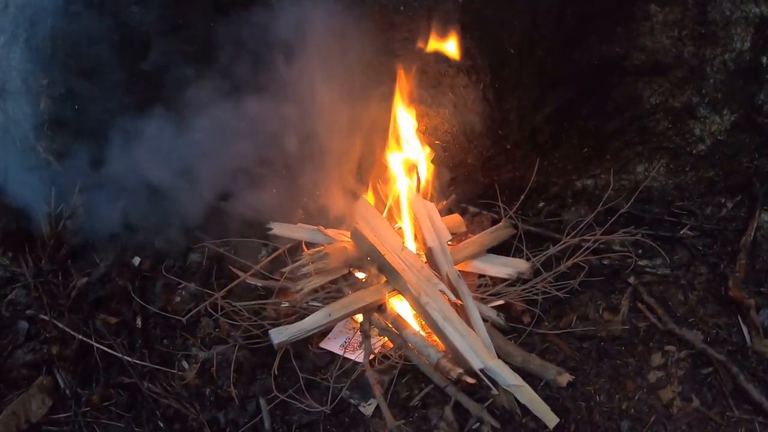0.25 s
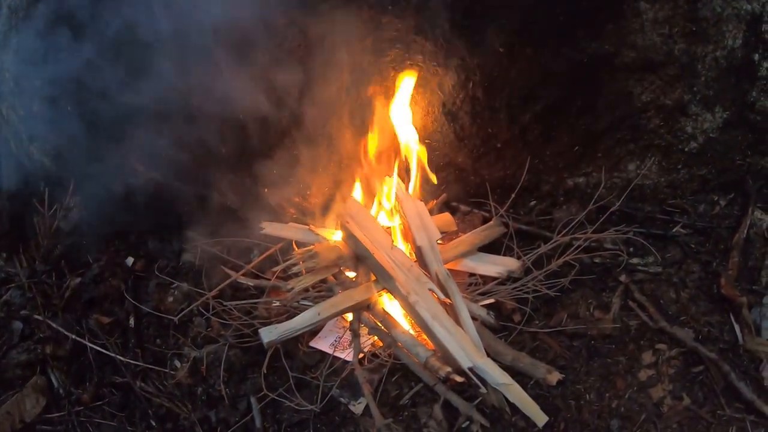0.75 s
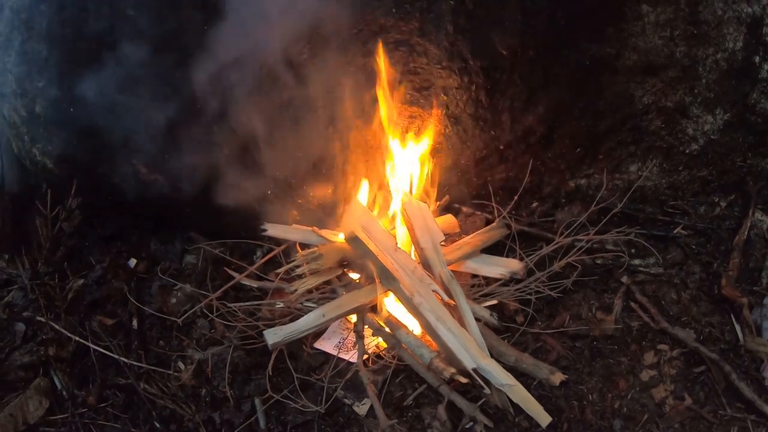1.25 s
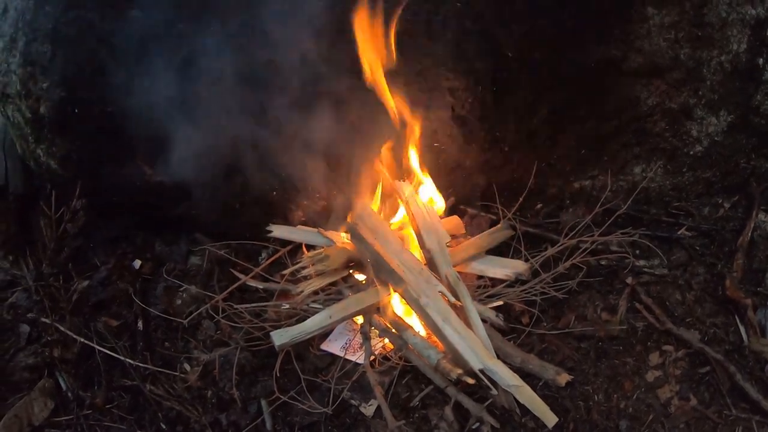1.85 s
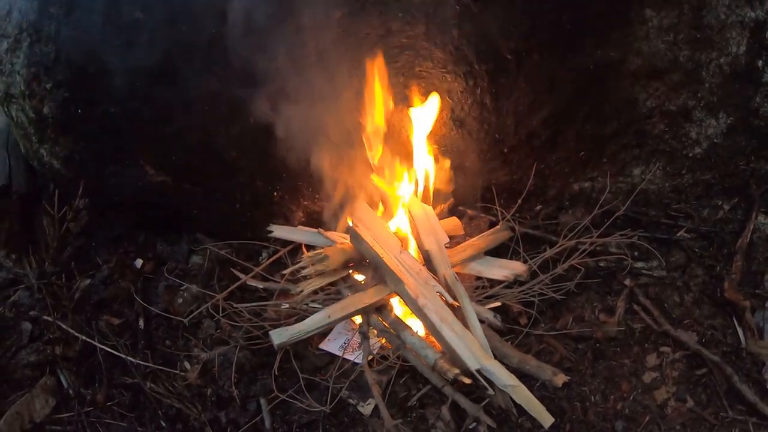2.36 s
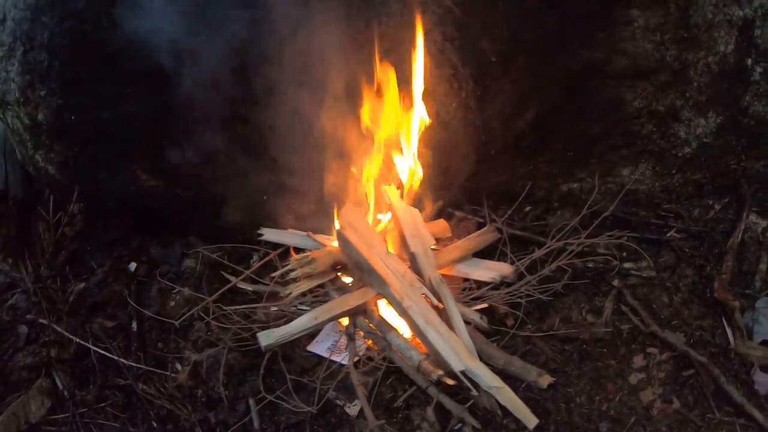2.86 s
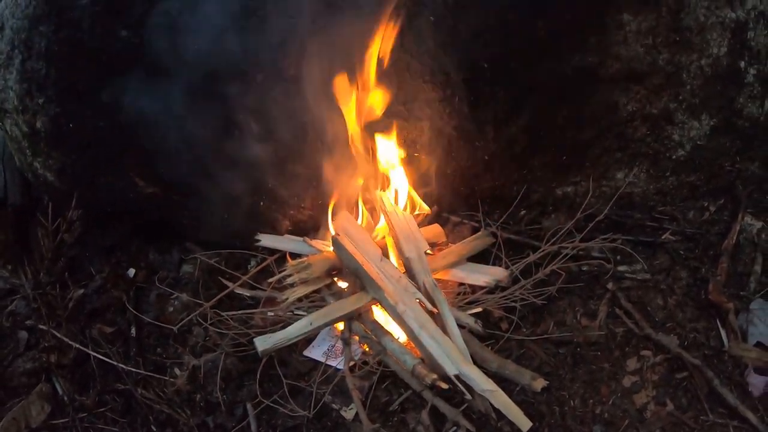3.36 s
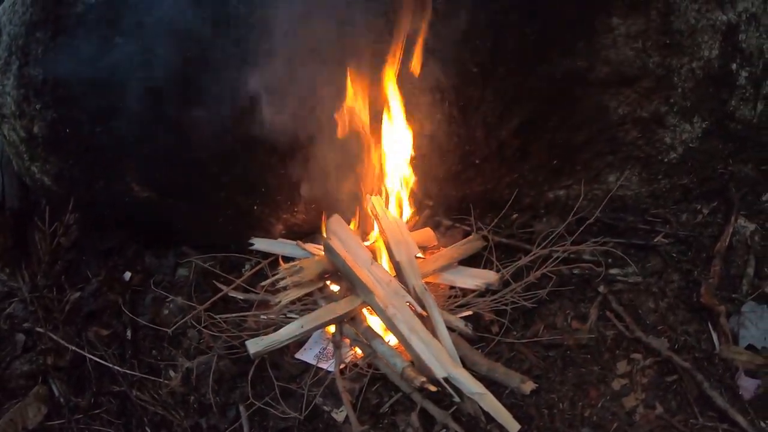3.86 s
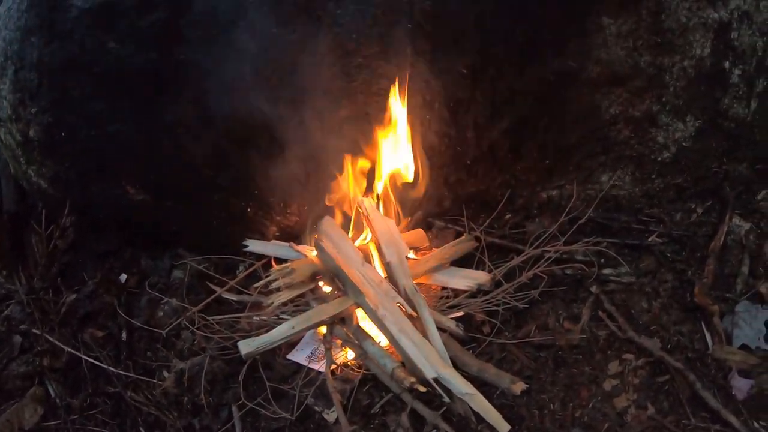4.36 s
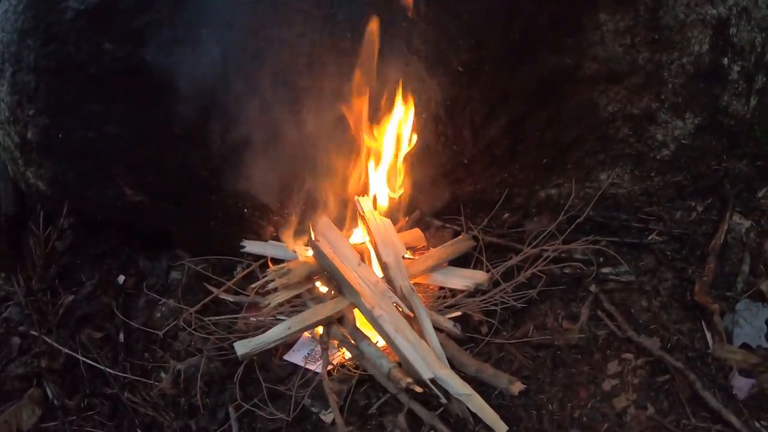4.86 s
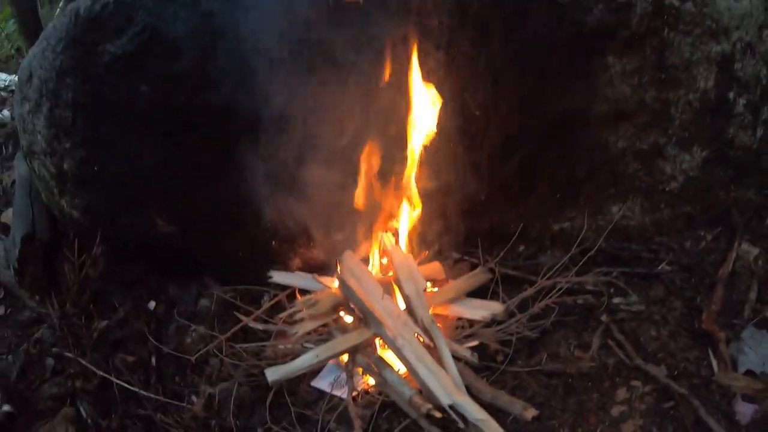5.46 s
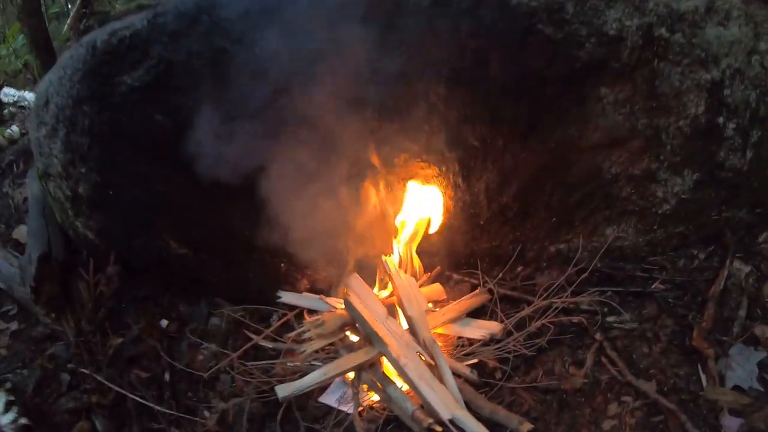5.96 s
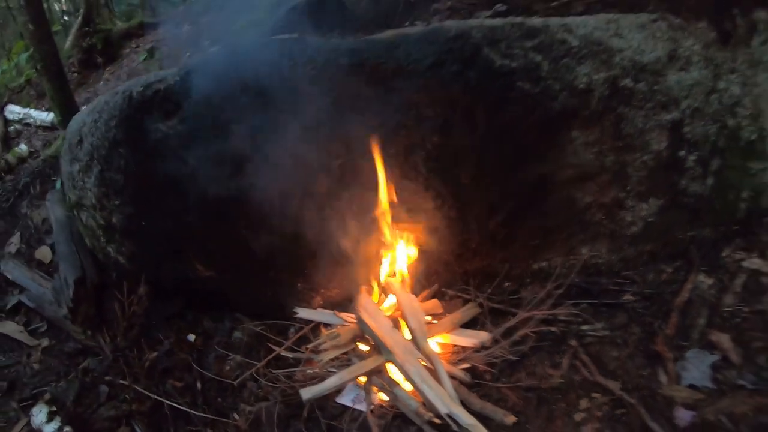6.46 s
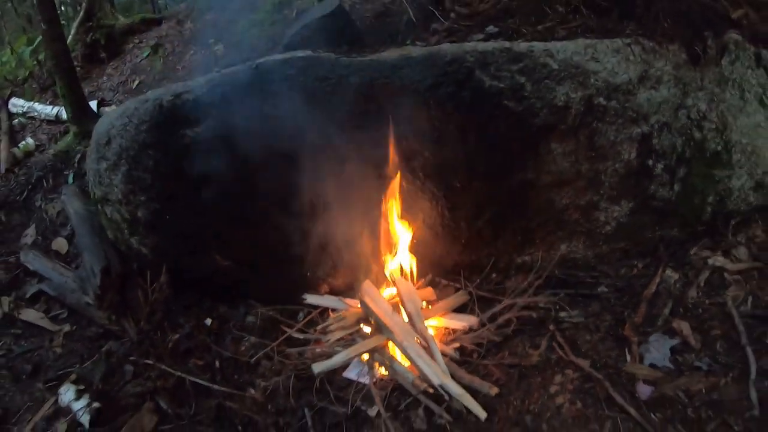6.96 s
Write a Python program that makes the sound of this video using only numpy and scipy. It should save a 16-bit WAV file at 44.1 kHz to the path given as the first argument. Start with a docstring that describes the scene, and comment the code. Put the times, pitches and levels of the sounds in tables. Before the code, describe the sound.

A small campfire of fresh split wood, heard close outdoors with little reverberation. Irregular crackling, from tiny ticks to sudden hard snaps, dominates a soft low roar with brief fluttering thuds. Faint steam hisses, surging briefly after a big double crack early on. Cracks cluster densely in the later part, then a thin flickering hiss stays on the right before a very short breathy squeak.

```python
"""Small kindling fire

Sap pockets burst and crack the sticks before a rock: noise bursts through resonances, plus echoes.
Flames roar, rumble and flap low: gusted noise and short pulses. Steam and the quiet woods are coloured noise.
Near the end a vent hisses on the right and something squeaks once: a wavering sine with narrow noise above."""
import sys
import numpy as np
from scipy import signal
from scipy.fft import rfft, irfft, next_fast_len
from scipy.io import wavfile
from scipy.ndimage import uniform_filter1d

SR = 44100
rng = np.random.default_rng(int(sys.argv[2]) if len(sys.argv) > 2 else 0)


def put_to_file(sound):
    """Save the sound as 16-bit audio at rate SR, in the file named by the first command-line argument."""
    columns = np.atleast_2d(sound).T  # one column per channel
    safe = np.clip(columns, -1, 1)
    whole_steps = np.round(safe * 32767)
    wavfile.write(sys.argv[1], SR, whole_steps.astype(np.int16))


N = 317961  # 7.21 s

# colour of the woods, before levelling: (frequency [Hz], relative density [dB per Hz])
WOODS_COLOUR = [(180, -25), (300, 11), (376, 4), (562, -3.5), (826, 2), (1050, -9), (1300, -4), (4060, -30),
                (7720, -25.5), (12300, -22.5), (14000, -35.5)]
# flame body: (time [s], roar level [dB], rumble level [dB]), before gusts
FLAME_LEVELS = [(0, -49, -67), (.6, -54, -75), (1.3, -54.5, -63), (2, -55.5, -65), (2.9, -51, -63),
                (3.25, -55, -63), (4, -55, -68.5), (4.9, -52.5, -61.5), (5.5, -53.5, -63.5),
                (6.3, -56.5, -54), (6.6, -54, -52.5), (7.21, -62, -71.5)]
# colour of the roar: (frequency [Hz], relative density [dB per Hz])
ROAR_COLOUR = [(47, -42), (80, 0.5), (102, -8), (173, 3.5), (213, -1.5), (457, -23), (700, -31), (910, -76),
               (1540, -120)]
# colour of the rumble: (frequency [Hz], relative density [dB per Hz])
RUMBLE_COLOUR = [(18, -27.5), (35, -12.5), (60, -2.0), (95, -10.5), (130, -12)]
# timed flaps of single flame tongues: (time of peak [s], peak level [dB], pitch [Hz])
TIMED_FLAPS = [(0.146, -34, 148), (0.169, -32, 129), (0.283, -31.5, 159), (0.371, -30.5, 195),
               (0.512, -36, 102), (0.686, -37, 148), (0.918, -35.5, 89), (1.007, -36, 176),
               (1.117, -35, 155), (1.487, -38, 82.5), (1.776, -33.5, 170), (2.255, -35.5, 130),
               (2.434, -31, 162), (2.484, -34, 165), (2.535, -37, 185), (2.573, -41.5, 188),
               (2.886, -33.5, 109), (2.952, -35.5, 196), (3.141, -33, 142), (3.465, -39, 162),
               (3.634, -34, 139.6), (3.978, -34.5, 126), (4.757, -40, 161), (4.906, -34, 132),
               (4.998, -32.5, 150), (5.558, -44, 152), (6.003, -33.5, 116), (6.457, -33.5, 166)]
# flaps at random moments, mean and spread: (peak level [dB], pitch [Hz])
RANDOM_FLAP_MEAN = (-41.5, 112)
RANDOM_FLAP_SPREAD = (0.67, 27)
# colour of the steam from the cut ends: (frequency [Hz], relative density [dB per Hz])
STEAM_COLOUR = [(590, -26), (1000, -22), (1370, -7.5), (2230, -8), (3340, 2.5), (5380, -6.5), (7190, -2.5),
                (12300, -43), (13400, -45.5), (16000, -49)]
# surges of steam after bursts: (onset [s], added level [dB])
STEAM_SURGES = [(1.438, -61), (5.56, -67), (5.82, -66)]
# timed bursts of sap pockets, loud and faint: (time [s], body peak [dB], ring [Hz],
# low knock re body [dB], bright edge re body [dB], edge left minus right [dB])
TIMED_POPS = [(0.0658, -37.5, 3800, -13, -6.5, 9), (0.0786, -41, 3540, -16, -28, 11),
              (0.099, -42.5, 3520, -10, -33, -1), (0.1944, -40.5, 3250, -18, -8, -12),
              (0.3695, -22.5, 2650, -9, -14.5, -13), (0.4304, -31.5, 3180, -10, -5, -3),
              (0.5298, -26.5, 3400, -34, -6.5, -1), (0.5614, -33.5, 3320, -24, -29, -3),
              (0.7046, -47, 3680, -14, -7, -3), (0.7614, -36.5, 3200, -32, -34, -2),
              (0.8498, -44.5, 2380, -5, -28, -5), (0.9405, -46.5, 3230, -22, 4, -5),
              (1.127, -46, 3670, -30, -1, -6), (1.2107, -32.5, 4750, -8.5, 0, -12),
              (1.2622, -29.5, 4050, -29, -6.5, -6), (1.299, -36, 3100, -30, -14, 1),
              (1.329, -38.5, 2420, -21, 6, -2), (1.342, -36.5, 3640, -25, 0, -2),
              (1.3742, -34, 2950, -24, -10, -3), (1.3796, -7.5, 4500, -28, -14, 10),
              (1.4363, -3.5, 3060, -11.5, -5, -1), (1.4988, -39, 1900, -5, 1, -2),
              (1.5535, -17, 2970, -18, -38, 5), (1.5916, -30.5, 2800, -21, 0, 2),
              (1.679, -35.5, 2380, -7.5, -23, 8), (1.8057, -33, 2290, -9, 2, -4),
              (1.8337, -28, 2820, -11, 5, 4), (2.0417, -40.5, 2120, -20, -22, -2),
              (2.0608, -38.5, 1870, -6, -34, -6.5), (2.202, -42, 3770, -14, 6, -2.5),
              (2.2964, -36.5, 3600, -36, 0.5, -1), (2.3708, -40.5, 3500, -10, 2.5, -4),
              (2.425, -27.5, 3160, -25, -1, 1), (2.4297, -43, 4090, -7, -17, -4),
              (2.599, -45, 3320, -13, -12, -5), (2.6608, -39, 3540, -14, 5.5, 0),
              (2.7566, -30.5, 5450, -7, -8, 4), (2.793, -39, 6960, -19, -9, -13),
              (2.8344, -42, 7100, -9.5, -3, -1), (2.8598, -56, 1510, 11.5, -25, 0),
              (2.95, -64.5, 1480, 17.5, -22, 3.5), (3.0445, -29, 7000, -22, -3, -5),
              (3.059, -32, 7040, -24, -2.5, 0), (3.0855, -31, 2080, -18, -1, -1),
              (3.3193, -11.5, 2870, -7.5, -21.5, 27), (3.6111, -20, 3250, -11.5, -1, -4),
              (3.7013, -27, 3660, -14, -13, 19), (3.849, -43.5, 3810, -22, -38, 2),
              (3.9372, -23, 2900, -2, -12, 1), (3.9801, -39, 4500, -1, 1, -5),
              (3.9927, -20, 4580, -10.5, -2.5, -3), (4.1597, -47, 2520, -4, -24, -5),
              (4.1692, -42.5, 2500, -21, -22, -3), (4.1923, -30.5, 3100, -15, -16, 2),
              (4.2244, -36, 7350, -18, 1, -1.5), (4.2972, -39.5, 3230, -25, -1, -3),
              (4.3688, -40, 1710, -9, 1, -8), (4.3795, -4, 3200, -19, -5, -8),
              (4.402, -33, 1930, -5, 5, -5), (4.4684, -9, 3300, -19, -5, -2.5),
              (4.4807, -19.5, 4050, -8.5, -14, 1), (4.6752, -37.5, 3220, -32, -14, 4),
              (4.8093, -43.5, 3470, -11, 7, -2.5), (4.8953, -34, 4430, -21, 3.5, -2),
              (4.9217, -33, 3450, -12, 4.5, -4), (4.982, -24.5, 5800, -7.5, -11, 0),
              (5.2154, -34, 3200, -12, -1, -0.5), (5.2275, -36, 3380, -22, -9, 5),
              (5.2487, -40, 3440, -20, 4, -4), (5.2931, -44.5, 3360, -15, 3, -4),
              (5.3606, -25, 5200, -27, -4, -1), (5.396, -46.5, 3510, -20, -18, 2),
              (5.4202, -47, 2910, -19, -15, 4), (5.4497, -36.5, 3560, -25, 1, -0.5),
              (5.5088, -48, 3570, 0, -14, -9), (5.5203, -41.5, 3000, -10, -5, 7),
              (5.5376, -46, 3620, -15, 1, -2), (5.5581, -33.5, 4730, -24, -14, 3),
              (5.5705, -30.5, 3020, -19, -2, -6), (5.5997, -29.5, 5800, -19, -7, -3),
              (5.607, -36, 3880, -26, 2, 3), (5.635, -36, 2170, -22, -18, 3),
              (5.6452, -24, 2810, -31, -5.5, -1), (5.6736, -42, 2780, -20, -26, 0),
              (5.7133, -15.5, 3200, -21.5, -31, 6), (5.7423, -41, 2800, -3, -23, -2),
              (5.767, -39, 2480, -5, -21, 1), (5.7854, -41.5, 2470, 3, -20, 2),
              (5.811, -33, 3214, -19, 3, -7), (5.8185, -6.5, 5130, -24, -20, -13),
              (5.8338, -43, 5700, -25, 1.5, 1), (5.9274, -42, 4070, -12, -10, 0),
              (5.959, -32.5, 2150, -9.5, -2, 0), (5.9696, -34.5, 3960, -16, -3, -7),
              (5.9954, -38.5, 2070, -6, -5, -1), (6.1713, -39.5, 3540, -6, 0.5, 0.5),
              (6.2066, -47.5, 7350, -14, 10, -8.5), (6.277, -43.5, 2880, -9, -13, -2),
              (6.2907, -41, 3700, -16, -3, -8), (6.3384, -29.5, 5800, -41, -6, 5),
              (6.3555, -37, 6100, -19, -1, -0.5), (6.3906, -6, 3340, -8.5, 0, -7.5),
              (6.405, -38, 4520, -2, 11, -12), (6.4521, -30.5, 4450, -11, -2, 5),
              (6.5327, -36.5, 4300, -27, -23, -4), (6.6507, -36, 2950, -9, -15, -5),
              (6.7204, -21.5, 5450, -15, 2, -0.5), (6.7305, -35, 2910, -7, -7, -4),
              (6.7842, -36.5, 4160, -18, -6, -6), (6.7986, -23.5, 4000, -38, 5.5, -2),
              (6.957, -41, 2300, -7, -19, -10), (7.049, -26.5, 2140, -14.5, -27, 7),
              (7.085, -41, 3300, -13, -1, -3)]
# bursts at random moments, mean and spread: (body peak [dB], ring [Hz], low knock re body [dB],
# bright edge re body [dB], edge left minus right [dB])
RANDOM_POP_MEAN = (-46.5, 3289, -16, -12.5, 1)
RANDOM_POP_SPREAD = (1.5, 600, 6, 8, 3)
# resonances shared by all pops, partly the microphone's:
# (frequency [Hz], width [Hz], relative level in a pop [dB])
SHARED_MODES = [(3300, 1000, -2), (4470, 1400, -11), (2000, 5070, 2.5)]
# fresh vent opening with a loud pop: (time [s], level [dB]), before flutter and pan
VENT_LEVELS = [(6.385, -100), (6.4, -52.5), (6.5, -60.5), (6.75, -55.5), (6.9, -64.5), (7.21, -61)]
# colour of the vent: (frequency [Hz], relative density [dB per Hz])
VENT_COLOUR = [(410, -17), (700, -4), (827, 3.5), (965, -7), (1420, 1), (3220, 0), (5240, -2.5),
               (7320, 3.5), (12200, -16.5), (15000, -53)]
# the squeak: (time [s], centre pitch [Hz], level before flutter and pan [dB])
SQUEAK_GLIDE = [(7.162, 1265, -66.5), (7.18, 1286, -55.5), (7.2, 1305, -57.5), (7.21, 1250, -56)]

WOODS_DB = -65.5
RANDOM_FLAP_COUNT, RANDOM_POP_COUNT = 25, 20
STEAM_DB, SURGE_FADE_S = -73.5, 0.067  # steady flow; decay time constant
LEAD_S = 0.001  # the tear before each burst
SPLINTER_DB, SPLINTER_T60_S = -16, 0.011
ROCK_S, ROCK_SMEAR_S, ROCK_DB = 0.0039, 0.00047, -33  # echo delay, spread and gain
SNAP_DB, SNAP_HZ, SNAP_WIDTH_HZ = -16.5, 5550, 16000  # the burst heard directly, re body
TREES_T60_S, TREES_DB = 0.13, -28.5
VENT_PAN_DB = -6  # left minus right
TOP_HZ = 16400
LEFT_RIGHT = np.array([[1], [-1]])  # opposite signs widen or pan


def undb(db):
    """Decibels to a linear gain."""
    return 10 ** (np.asarray(db) / 20)


def level(x, db):
    """Set the rms level."""
    return x * undb(db) / np.sqrt(np.mean(x ** 2))


def unit(x):
    """Set the peak to 1."""
    return x / np.abs(x).max()


def curves(table):
    """Draw straight automation lines through each column of a timed table."""
    s, *columns = np.transpose(table)
    return [np.interp(np.arange(N) / SR, s, column) for column in columns]


def ring(x, hz, width_hz):
    """One resonance, gain 1 at its centre."""
    return signal.lfilter(*signal.iirpeak(hz, hz / width_hz, fs=SR), x)


def noise(colour, channels=1):
    """Noise of rms 1, coloured by a spectrum drawn on a log frequency axis."""
    hz, db = np.transpose(colour)
    size = next_fast_len(N)
    bins_hz = np.arange(1, size // 2 + 2) * SR / size
    gain = undb(np.interp(np.log(bins_hz), np.log(hz), db, left=-120, right=-120))
    white = rng.standard_normal((channels, size))
    return level(irfft(gain * rfft(white), size)[:, :N], 0)


def walk(rate):
    """Random levels held 1 / rate seconds and slewed twice; spread near 1."""
    hold = int(SR / rate)
    steps = np.repeat(rng.standard_normal(N // hold + 1), hold)
    return 1.59 * uniform_filter1d(uniform_filter1d(steps, hold), hold)[:N]


def scatter(count, mean, spread):
    """Rows of (time [s], values near the mean) at random moments."""
    deviation = np.clip(rng.standard_normal((count, len(mean))), -2, 2)
    times = rng.random(count) * N / SR
    return np.c_[times, mean + spread * deviation]


def add(out, x, s):
    """Mix a sound in at a time in seconds."""
    i = int(s * SR)
    out[..., i:i + x.shape[-1]] += x[..., :max(N - i, 0)]


def quiet_woods():
    """The wood around: steady, faint noise, independent on each side."""
    return undb(WOODS_DB) * noise(WOODS_COLOUR, channels=2)


def flame():
    """Gusty roar over a slower rumble; single tongues flap for a cycle or two."""
    roar_db, rumble_db = curves(FLAME_LEVELS)
    gust = walk(35)
    centre = undb(roar_db + 4 * np.minimum(gust, 1.2)) * noise(ROAR_COLOUR)[0]
    flaps = np.r_[TIMED_FLAPS, scatter(RANDOM_FLAP_COUNT, RANDOM_FLAP_MEAN, RANDOM_FLAP_SPREAD)]
    for s, db, hz in flaps:
        cycles = np.arange(-2 / hz, 2 / hz, 1 / SR) * hz
        flap = -np.cos(2 * np.pi * cycles) * np.exp(-.5 * (cycles / 0.33) ** 2)
        add(centre, undb(db) * flap, max(s - 2 / hz, 0))
    mid, side = noise(RUMBLE_COLOUR, channels=2)
    rumble_gain = undb(rumble_db + 2 * gust + 7.3 * np.tanh(walk(12)))
    rumble = rumble_gain * (mid + 0.47 * side * LEFT_RIGHT)
    width = undb(roar_db - 18) * noise(ROAR_COLOUR) * LEFT_RIGHT  # the flame is wide
    return centre + width + rumble


def steam():
    """Vapour hisses from the cut ends, surging after some bursts and fading exponentially."""
    t = np.arange(N) / SR
    mid, side = noise(STEAM_COLOUR, channels=2)
    flow = undb(STEAM_DB)
    for s, db in STEAM_SURGES:
        flow = flow + undb(db) * np.exp(-np.abs(t - s) / SURGE_FADE_S) * (t > s)
    return (mid + .5 * side * LEFT_RIGHT) * flow * undb(1.2 * walk(79))


def pop(chance, db, hz, low_db, edge_db, pan_db):
    """Fibres tear, the pocket bursts, splinters follow; resonances ring, rough rock and trees answer."""
    t = np.arange(chance.shape[1]) / SR - LEAD_S
    late = np.maximum(t, 0)
    tear = undb(-29) * np.exp(np.minimum(t, 0) / 0.00026) * (t < 0)
    splinters = undb(SPLINTER_DB - 60 * late / SPLINTER_T60_S) * (t > 0)
    rock = undb(ROCK_DB) * np.exp(-.5 * ((t - ROCK_S) / ROCK_SMEAR_S) ** 2)
    burst = chance[:3] * (tear + splinters + rock)
    burst[:, int(LEAD_S * SR)] = -1
    # both microphone ports share most of the crack
    crack = burst[0] + 0.24 * (burst[1:] - burst[0])

    shared = sum(undb(gain_db) * ring(crack, f, width) for f, width, gain_db in SHARED_MODES)
    body = ring(crack, hz, 0.22 * hz) + undb(-8) * shared
    # wood rings little higher up
    body = signal.lfilter(*signal.butter(2, 7000, fs=SR), ring(body, hz, 1.71 * hz))
    snap = ring(crack, SNAP_HZ, SNAP_WIDTH_HZ)

    knock = ring(ring(crack, 770, 610) + ring(crack, 1860, 900), 530, 1950)
    thump = np.sin(2 * np.pi * 215 * late) * late * np.exp(-late / 0.00095)
    low = unit(knock) + undb(-7.5) * unit(thump)

    # the shortest waves take different paths: the louder port hears them one sample first
    edge = ring(ring(burst[1:], 7500, 5500), 5240, 4700)
    far = int(pan_db > 0)
    edge[far] = np.roll(edge[far], 1, axis=0)
    sides = undb(LEFT_RIGHT * pan_db / 2)

    trees_fade = undb(TREES_DB - 60 * late / TREES_T60_S) * (t > 0)
    trees = ring(ring(chance[3:], 2900, 6400), 0.84 * hz + 1000, 7700) * trees_fade
    wood = unit(body) + undb(SNAP_DB) * unit(snap) + undb(low_db) * low
    return undb(db) * (wood + undb(edge_db) * unit(edge) * sides + trees)


def crackle(per_s=110, db=-46, spread_db=3.0):
    """Timed pops, more at random, and many faint impulses, each ringing one of the shared resonances."""
    out = np.zeros((2, N))
    pops = np.r_[TIMED_POPS, scatter(RANDOM_POP_COUNT, RANDOM_POP_MEAN, RANDOM_POP_SPREAD)]
    for (s, *row), chance in zip(pops, rng.standard_normal((len(pops), 5, 3500))):
        add(out, pop(chance, *row), max(s - LEAD_S, 0))
    for hz, width_hz, _ in SHARED_MODES:
        size_db = spread_db * np.minimum(rng.exponential(size=N), 3)
        ticks = (rng.random(N) < per_s / len(SHARED_MODES) / SR) * undb(db + size_db)
        out -= ring(ring(ticks, hz, 2 * width_hz), hz, 6000)
    return out


def fresh_vent():
    """A new opening hisses on the right: wide noise with a fast flutter in level."""
    gain_db = curves(VENT_LEVELS)[0] + LEFT_RIGHT * VENT_PAN_DB / 2 + 2.3 * walk(90)
    return noise(VENT_COLOUR, channels=2) * undb(gain_db)


def squeak():
    """A short breathy squeak, a wavering sine with a blurred partner above, mostly on the right."""
    hz, db = curves(SQUEAK_GLIDE)
    phase = 2 * np.pi * np.cumsum(hz * (1 + 0.0211 * walk(300))) / SR
    tone = np.sin(phase) * undb(2 * walk(210))
    air = rng.standard_normal(N)
    blur = level(ring(ring(air, 1760, 300), 1700, 300), -9.5) + level(ring(air, 1500, 150), -12)
    started = np.arange(N) > SQUEAK_GLIDE[0][0] * SR
    return (tone + blur) * undb(db) * started * undb([[-6], [3]])


def scene():
    """Sum the layers."""
    return quiet_woods() + flame() + steam() + crackle() + fresh_vent() + squeak()


def record(dry):
    """The microphones fade in the treble and the camera cuts the top."""
    mic = signal.lfilter(*signal.butter(2, 10000, fs=SR), dry)
    return signal.sosfilt(signal.ellip(8, .2, 70, TOP_HZ, fs=SR, output="sos"), mic)


dry = scene()
out = record(dry)
put_to_file(out)
```